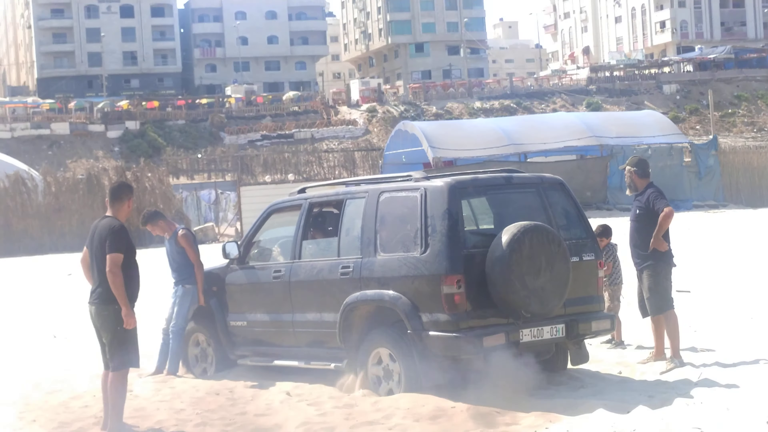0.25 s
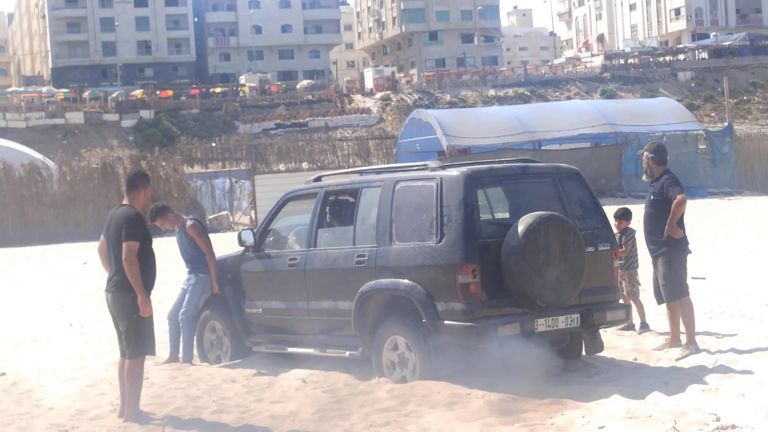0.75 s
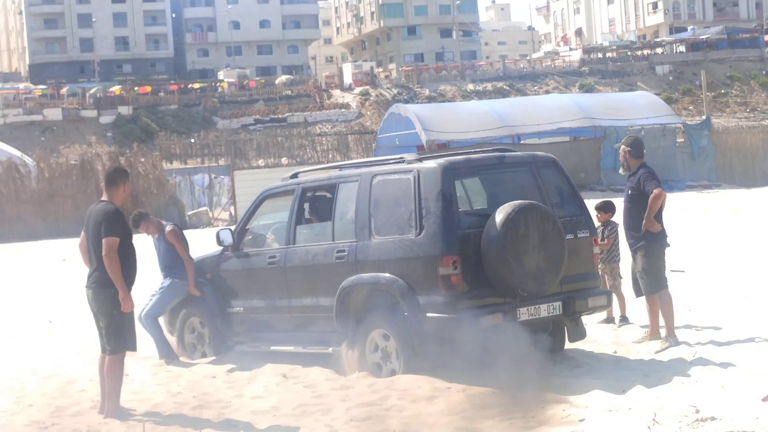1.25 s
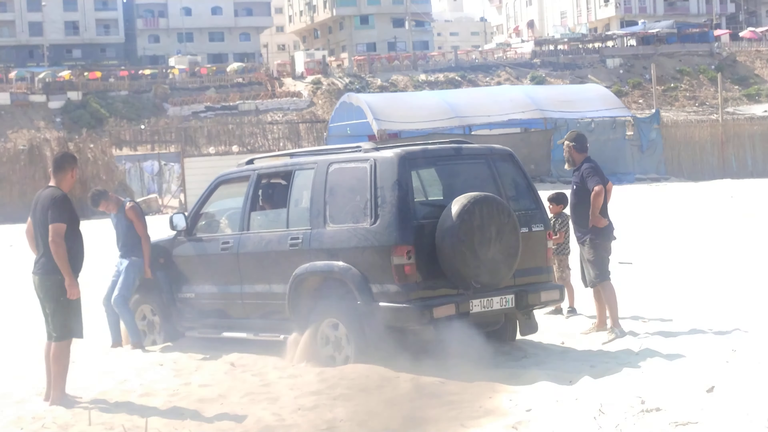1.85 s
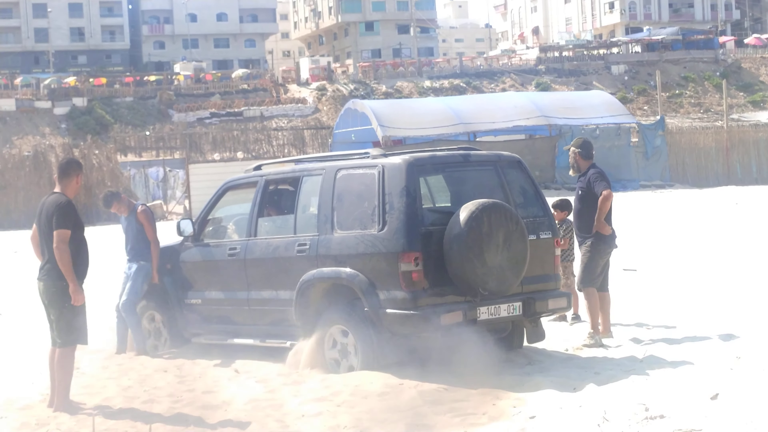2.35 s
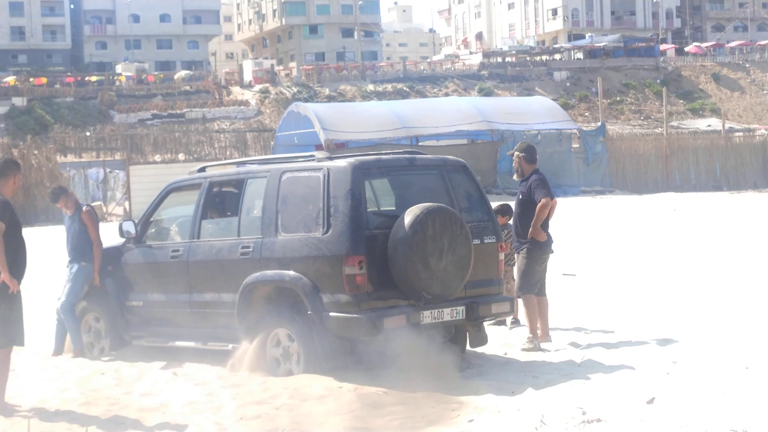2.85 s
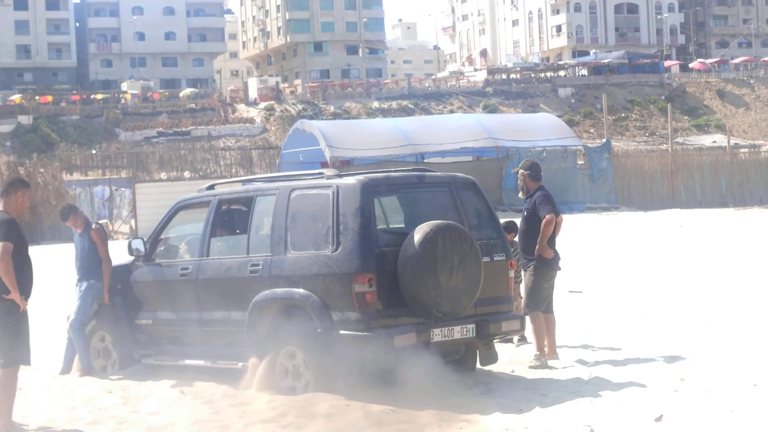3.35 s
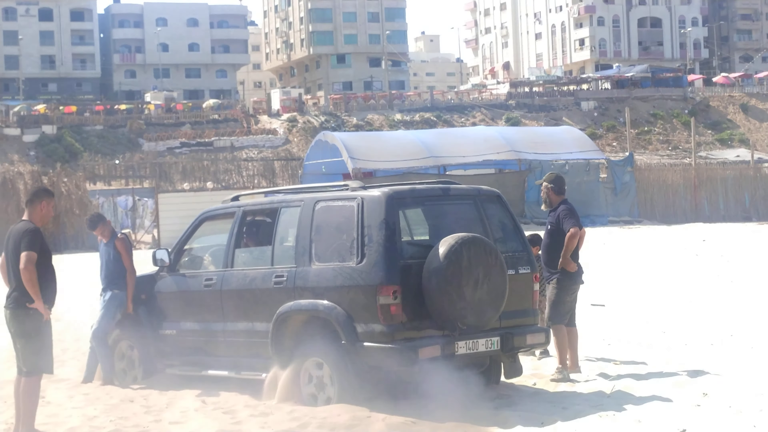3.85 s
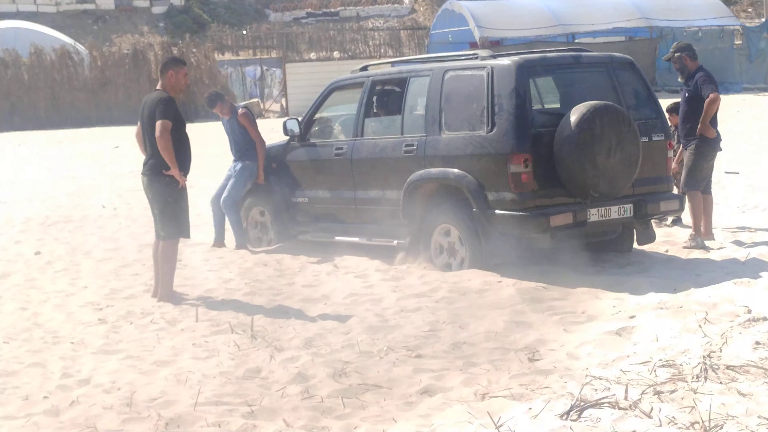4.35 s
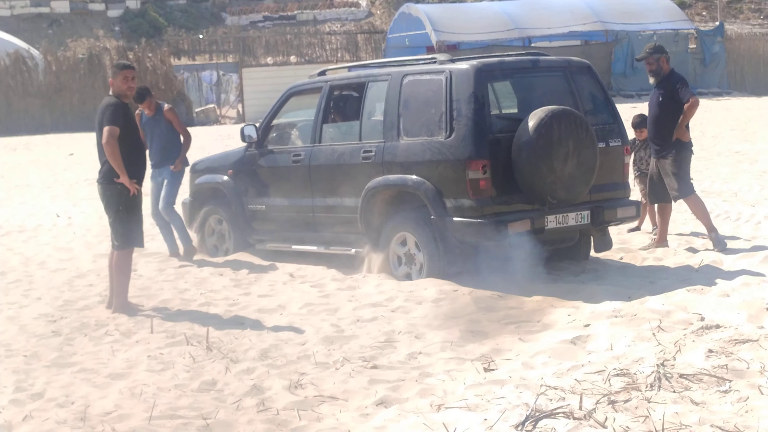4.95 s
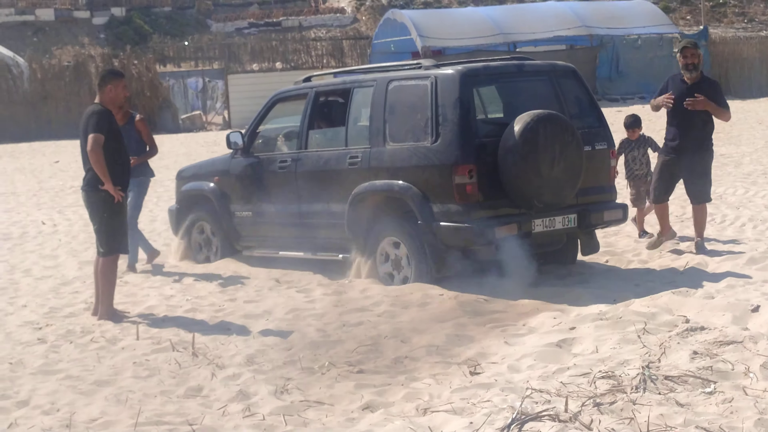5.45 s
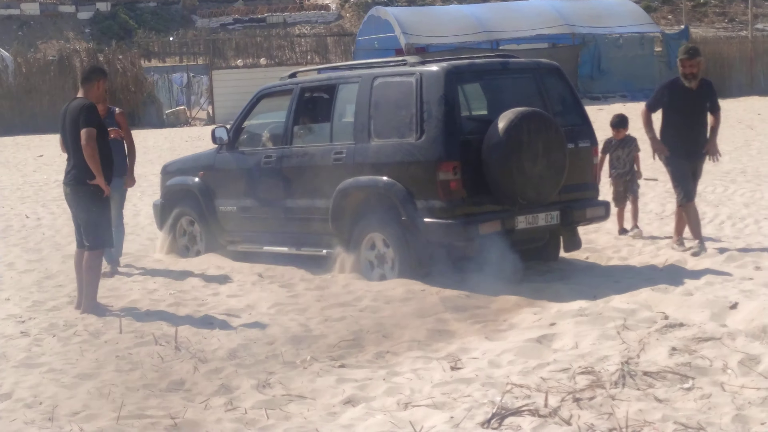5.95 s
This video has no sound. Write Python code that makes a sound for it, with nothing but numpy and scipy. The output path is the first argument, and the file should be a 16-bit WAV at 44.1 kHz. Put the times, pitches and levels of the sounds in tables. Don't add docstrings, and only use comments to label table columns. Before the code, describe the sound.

A stuck four-cylinder diesel takes up load with belt whirr, a hissing burst of sand and a dull driveline clunk, then drones hard with exhaust roar and valve clatter. Later it eases down with another clunk and a little grit shower, and runs on lower. Outdoors, handheld phone, low gusty wind thumps hitting chiefly the right side, very faint distant surf.

```python
import sys
import numpy as np
from scipy import signal
from scipy.fft import rfft, irfft, next_fast_len
from scipy.io import wavfile
from scipy.ndimage import uniform_filter1d

SR = 44100
rng = np.random.default_rng(int(sys.argv[2]) if len(sys.argv) > 2 else 0)


def transcribe(signal):
    frames = np.atleast_2d(signal).T
    limited = np.clip(frames, -1, 1)
    pcm = np.round(limited * 32767).astype(np.int16)
    wavfile.write(sys.argv[1], SR, pcm)


def invert_db(level):
    return 10 ** (np.asarray(level, dtype=float) / 20)


N = 272979
T = np.arange(N) / SR
FFT_SIZE = next_fast_len(N)
HZ = np.fft.rfftfreq(FFT_SIZE, 1 / SR)
TURN_S = 4.2

# time in seconds, firings per second.
FIRING_RATE = [(0, 65.3), (.15, 65.6), (.3, 69.9), (.45, 81), (.6, 93.5), (.73, 98.5), (.9, 93.9),
               (1.05, 92.5), (1.8, 92.6), (2.25, 93.9), (2.85, 94.5), (3.55, 94.3), (3.8, 91), (4.05, 80.7),
               (4.2, 74.1), (4.35, 70.9), (5.9, 69.6), (6.19, 72.5)]
# time in seconds, load 0-1, valve gear chatter 0-1.
EFFORT = [(0, 0, 0.45), (.3, 0, 0.6), (.45, 0.26, 0.93), (.75, 0.66, 0.9), (1.05, 0.75, 0.93),
          (1.8, 0.68, 0.9), (2.85, 0.72, 1), (3.55, 0.82, 0.87), (3.75, 0.8, 0.46), (4.05, 0.22, 0.26),
          (4.2, 0, 0.8), (4.35, 0.19, 0.88), (4.9, 0.02, 0.92), (5.05, 0.03, 0.46), (5.7, 0.07, 0.4),
          (6.19, 0.04, 0.7)]
# frequency in Hz, density in dB per Hz.
HISS = [(1880, -18.5), (3200, -1.5), (3560, -1.5), (3850, -0.5), (4190, -3.5), (4940, -5.5), (5420, -4.5),
        (5980, -8), (7100, -7.5), (7340, -8.5), (9300, -2.5), (10700, -13.5), (11500, -19), (13400, -25.5),
        (15400, -31)]


def evened(x):
    return x / np.sqrt(np.mean(x ** 2) + 1e-20)


def read(points, hz):
    f, value = np.transpose(points)
    return np.interp(np.log(hz + 1), np.log(f + 1), value)


def curve(rows, column=1):
    rows = np.array(rows)
    return np.interp(T, rows[:, 0], rows[:, column])


def wander(rate_hz):
    lowpass = signal.butter(2, rate_hz, fs=SR, output="sos")
    return evened(signal.sosfilt(lowpass, rng.standard_normal(N + SR))[SR:])


def coloured(x, spectrum):
    inside = (HZ > spectrum[0][0]) & (HZ < spectrum[-1][0])
    shaped = rfft(x, FFT_SIZE) * invert_db(read(spectrum, HZ)) * inside
    return evened(irfft(shaped, FFT_SIZE)[..., :N])


def add(mix, s, sound):
    part = mix[max(round(s * SR), 0):][:len(sound)]
    part += sound[:len(part)]


def surf():
    # frequency in Hz, density in dB per Hz.
    wash = [(380, 0.5), (430, -2.5), (480, 2), (620, -2.5), (800, -5.5), (950, -20)]
    return invert_db(-57) * coloured(rng.standard_normal((2, N)), wash)


def eddy(s, db, hz, length_s):
    u = np.linspace(0, 1, round(length_s * SR))
    rise = np.clip(.8 - max(db + 12, 0) * .04, .3, 1)
    shape = np.sin(np.pi * u ** rise) ** 2
    peak = shape.argmax()
    turns = np.cumsum(hz * (.8 + .45 * np.exp(-u / .3))) / SR
    swing = 2 * np.pi * (turns - turns[peak] + .3 * (rng.random() - .5))
    pressure = -np.cos(swing) - 0.19 * np.cos(2 * swing)
    return s - peak / SR, invert_db(db - 3.6) * pressure * shape


def eddy_streets():
    # start and end in seconds, level in dB.
    spells = [
        (4.492, 5, -25.5),
        (4.2, 3.7, -16),
        (5.442, 5, -18),
        (5.2, 5.26, -24),
        (2.055, 2.09, -8.5),
        (0.33, .41, -18),
    ]
    pace_s, length_ms = .034, 11
    rows = []
    for start, end, db in spells:
        for i in range(12):
            late, size, pitch = rng.random(3)
            s = start + pace_s * (i + 0.95 * late)
            if s < end:
                rows.append((s, db + 2.3 * (size - .5), 180 + 150 * pitch, length_ms))
    return rows


def wind():
    # time in seconds, level in dB, pitch in Hz, length in ms.
    left_eddies = [
        (.805, -20, 233, 24),
        (1.834, -9.5, 278, 11),
        (1.86, -22, 200, 12),
        (5.61, -13, 240, 6.9),
        (5.628, -15, 205, 22),
        (5.65, -25, 180, 11),
    ]
    right_eddies = [(0.05, -16, 300, 4.5), (0.064, -18, 226, 3.9), (1.129, -14, 317, 28),
                    (1.968, -16.5, 343, 24), (1.995, -7.5, 357, 7), (2.017, -5, 278, 5.4),
                    (2.028, -17, 249, 5.2), (2.039, -8, 215, 5.8), (2.051, -5.5, 183, 5.3),
                    (2.094, -9, 240, 13), (2.104, -8.5, 214, 4.8), (2.131, -10, 355, 19),
                    (2.541, -15, 289, 4.5), (2.591, -13, 215, 13), (2.633, -14.5, 368, 5),
                    (2.85, -19, 310, 7.6), (2.884, -21, 250, 8), (2.904, -19, 230, 6.5),
                    (2.916, -13.5, 220, 12), (3.219, -7, 270, 14), (3.234, -14, 190, 4.3),
                    (3.481, -9.5, 295, 5.4), (3.494, -14.5, 228, 10), (3.51, -17, 225, 4),
                    (3.559, -19.5, 380, 9.3), (3.599, -17, 193, 7.9), (3.621, -12, 226, 8.4),
                    (3.638, -9, 255, 11), (3.657, -8.5, 258, 6.2), (3.676, -10, 324, 4),
                    (3.712, -7, 362, 3.6), (3.722, -11, 276, 9.6), (3.731, -10, 177, 4),
                    (3.772, -16, 296, 9.9),
                    (3.826, -12, 269, 9.4), (3.846, -14, 237, 8.7), (3.861, -13, 202, 12),
                         (3.887, -34, 242, 6.2), (3.904, -11.5, 312, 3.5), (3.932, -13, 210, 7),
                         (4.0, -18, 354, 13), (4.017, -23, 230, 7), (4.04, -16.5, 245, 6.8),
                         (4.056, -8.5, 235, 5.4), (4.081, -10.5, 217, 9.8), (4.092, -31, 207, 13),
                         (4.564, -21.5, 160, 14), (4.669, -8.5, 280, 4.4), (4.687, -13, 312, 2.2),
                         (4.704, -14.5, 306, 23), (4.716, -12, 340, 3.2), (4.731, -20, 188, 11),
                         (4.745, -13, 220, 5.8), (4.775, -19, 261, 3.7), (4.816, -5, 223, 3.4),
                         (4.836, -19, 172, 8.3), (4.854, -5.5, 240, 7), (4.864, -7.5, 236, 3),
                         (4.877, -4.5, 317, 4.7), (4.906, -2.5, 357, 5.4), (4.921, -11, 256, 5.9),
                         (5.124, -12.5, 272, 5.1), (5.134, -12, 228, 13), (5.148, -17, 236, 4.9),
                         (5.161, -16, 194, 11), (5.692, -14.5, 356, 18), (5.709, -15, 277, 7.7)]
    tears = [(2.008, -6, 430, 5.6), (2.127, -12, 680, 4.5), (3.215, -16, 480, 2.2), (3.712, -20, 696, 2),
             (3.998, -20, 603, 3.6), (5.701, -21, 603, 4.2), (4.679, -12, 530, 4.2), (4.806, -9.5, 190, 10),
             (4.875, -16, 630, 3), (4.904, -18, 1300, 0.68), (4.903, -29, 2030, 0.85),
             (4.912, -10.5, 788, 2.5), (4.918, -18, 1090, 5.3)]
    # time in seconds, level in dB.
    push = [(0, -27), (.2, -31), (.38, -28), (.6, -50), (.81, -44), (.95, -33), (1.3, -36), (1.68, -24),
            (1.85, -28), (2.3, -29.5), (2.75, -21), (3.05, -26.5), (3.6, -24.5), (4.05, -18), (4.35, -29),
            (4.75, -20), (5.35, -29.5), (6.19, -30.5)]
    # peak time in seconds, level in dB, port (0 left, 1 right).
    heaves = [(.05, -34, 1), (.55, -41, 1), (.81, -39, 1), (1.125, -25, 1), (1.68, -38, 1), (2.13, -29, 1),
              (2.6, -36, 1), (2.85, -31, 1), (3.1, -38, 1), (3.22, -27, 1), (3.47, -38, 1), (3.64, -23, 1),
              (3.73, -37, 1), (4.57, -33, 1), (4.72, -25, 1), (4.9, -21, 1), (5.16, -26, 1), (5.71, -24, 1),
              (1.84, -31, 0), (1.97, -35, 0), (2.13, -30, 0), (4.8, -44, 0), (5.62, -38, 0), (5.7, -33, 0)]
    # frequency in Hz, density in dB per Hz.
    flutter_colour = [(40, -13), (90, -2.5), (200, 4), (350, -1.5), (600, -12.5), (1000, -22.5),
                      (1800, -43), (2600, -41)]
    rumble_colour = [(4, 7), (15, 1), (45, 4.5), (100, -0.5), (150, 2.5), (300, -13)]
    calm_db, lee_db, heave_s = (-47, -43.5), -14.5, 0.034
    rip_hz, rip_db, rip_power = 430, -33, .15

    out, t = np.zeros((2, N)), np.arange(8000) / SR
    heave = t / heave_s * np.exp(1 - t / heave_s)
    lowpass = signal.butter(2, rip_hz, fs=SR, output="sos")
    right_rows = [*right_eddies, *tears, *eddy_streets()]
    for port, rows in enumerate((left_eddies, right_rows)):
        breeze = invert_db(curve(push) + lee_db * (1.5 - port) + 0.68 * wander(8.8))
        flutter = breeze * invert_db(-2.5 + 1.2 * wander(0.57))
        rumble = breeze + invert_db(calm_db[port] + 0.75 * wander(0.78))
        for s, db, hz, ms in rows:
            add(out[port], *eddy(s, db, hz, 0.0071 + 0.0012 * ms))
            stir = np.minimum(t / 0.009, 1) ** 2 * np.exp(-(t / (0.00044 * ms + 0.017)) ** 2)
            add(flutter, s - .012, invert_db(-30 + 1.3 * (db + 16)) * stir)
        for s, db, heaved_port in heaves:
            if round(heaved_port) == port:
                add(rumble, s - heave_s, invert_db(db) * heave)
        lumps = coloured(invert_db(2.0 * wander(56.0)) * rng.standard_normal(N), flutter_colour)
        dull = signal.sosfiltfilt(lowpass, lumps)
        rip = (lumps - dull) * (flutter / invert_db(rip_db)) ** rip_power
        out[port] += flutter * (dull + rip)
        out[port] += rumble * coloured(rng.standard_normal(N), rumble_colour)
    return out


def grit_ticks():
    # time in seconds, peak level in dB, pitch in Hz.
    hits = [
        (0.3336, -28, 9100),
        (0.6843, -30, 9200),
        (1.1937, -16.5, 6800),
        (1.8218, -29, 9630),
        (1.8502, -25, 8200),
        (2.2333, -30.5, 9900),
        (2.3281, -30.5, 9110),
        (2.3765, -28, 9200),
        (3.2924, -68, 9470),
        (4.2494, -34, 9200),
    ]
    out, t = np.zeros(N), np.arange(3000) / SR
    for s, db, hz in hits:
        band = signal.butter(4, [.68 * hz, 11300], "bandpass", fs=SR, output="sos")
        ping = np.cos(2 * np.pi * hz * t) * np.exp(-t / 0.0002)
        fizz = 0.046 * rng.standard_normal(len(t)) * np.exp(-t / 0.00056)
        add(out, s + 0.00071, invert_db(db + 5.5) * signal.sosfilt(band, ping + fizz))
    return out


def driveline_clunks():
    # time in seconds, peak level in dB, pitch in Hz.
    hits = [
        (0.788, -27, 1060),
        (1.437, -26.5, 1060),
        (3.551, -29, 744),
        (4.237, -23.5, 930),
    ]
    out, t = np.zeros(N), np.arange(3000) / SR
    envelope = np.exp(-t / 0.01) * np.minimum(t / 0.001, 1)
    for s, db, hz in hits:
        modes = (.39, .88, 1, 1.13, 1.27, 2.4)
        ring = sum(np.sin(2 * np.pi * hz * k * t + 6 * rng.random()) for k in modes)
        add(out, s, invert_db(db - 11.5) * ring * envelope)
    return out


def sand():
    # time in seconds, level in dB.
    spray_db = [(0, -51), (.25, -50), (.34, -46), (.5, -45.5), (.72, -42), (.85, -52), (1.0, -51),
                (1.15, -101), (6.19, -72)]
    grit_db = [(0, -56.5), (4.22, -81.5), (4.243, -48), (4.265, -44.5), (4.285, -54), (4.31, -47),
               (4.325, -45), (4.35, -74), (6.19, -67)]
    # frequency in Hz, density in dB per Hz.
    spray_colour = [(880, -30), (1500, -15.5), (2170, -4), (2480, -4), (3160, -34), (3550, -10),
                    (4310, -10), (9550, -9), (13800, -20), (15200, -56)]
    grains = invert_db(1.3 * rng.exponential(1, (2, N))) * rng.standard_normal((2, N))
    spray = invert_db(curve(spray_db) + 0.85 * wander(1.9)) * coloured(grains, spray_colour)
    return spray + invert_db(curve(grit_db)) * coloured(grains, HISS)


def puffing(turns, spectrum, depth, patchy_db):
    strength = invert_db(patchy_db * rng.standard_normal(700))[turns.astype(int)]
    gate = 1 + depth * strength * np.exp(-(turns % 1) / 0.36)
    return coloured(gate * rng.standard_normal((2, N)), spectrum)


def gear_whine(turns):
    # start and end in seconds, multiple of the firing rate, level in dB.
    meshes = [
        (2.7, 3.5, 25, -49),
        (4.5, 4.98, 24.9, -53),
        (5.2, 5.9, 24.93, -61),
        (5.0, 6.0, 17.9, -57),
    ]
    fade_s = 0.19
    slip = .1 * wander(6.0)
    tone = np.zeros(N)
    for start, end, k, db in meshes:
        fade = np.clip(np.minimum(T - start, end - T) / fade_s + 1, 0, 1) ** 2
        tone += invert_db(db) * fade * np.cos(2 * np.pi * (k * turns + slip))
    return tone * invert_db(1.2 * wander(9.7))


def belt_whirr(turns):
    # time in seconds, level in dB.
    whirr_db = [(0, -46), (.2, -43.5), (.3, -46), (.42, -56), (.55, -93), (6.19, -79)]
    # frequency in Hz, density in dB per Hz.
    whirr_colour = [(480, -13), (600, -9), (720, -20), (950, -34), (1400, -20), (1650, -11), (1900, -10),
                    (2200, -9), (2400, -42)]
    return invert_db(curve(whirr_db)) * puffing(turns, whirr_colour, depth=.7, patchy_db=1.0)


def drone(turns):
    # multiple of the firing rate, level in dB eased off, level in dB under load.
    orders = [(1, -39.5, -42.5), (1.5, -53, -44), (1.75, -60, -47), (2, -44.5, -32.5), (2.25, -60, -48),
              (2.5, -54, -51), (3, -47, -35.5), (3.75, -60, -48), (4, -56, -39), (4.25, -58, -50),
              (4.5, -56, -50), (4.75, -54, -56), (5, -60, -58), (4.62, -51, -62), (5.18, -45.5, -60),
              (5.5, -52, -67), (6, -60, -68)]
    pipe_hz, pipe_width_hz, pipe_db = 408, 16, 8
    load, speed = np.clip(curve(EFFORT), 0, 1), curve(FIRING_RATE)
    speed_change = np.gradient(speed) * SR
    unrest = uniform_filter1d(abs(speed_change), size=9000)
    pull = uniform_filter1d(np.maximum(speed_change, 0), size=6000)
    flare = uniform_filter1d(np.maximum(speed - 93.5, 0), size=8000, origin=2500)
    closing = np.maximum(-uniform_filter1d(np.gradient(load) * SR, size=6000), 0)
    out = np.zeros(N)
    for k, eased_db, load_db in orders:
        slip = rng.random() + .004 * k * wander(3.0)
        db = eased_db + load * (load_db - eased_db) + 1.2 * wander(4.0)
        db += pipe_db * np.exp(-((k * speed - pipe_hz) / pipe_width_hz) ** 2)
        if k == 1.5:
            db += 2.0 * flare
        if k == 2:
            db -= .22 * unrest
        if k == 3:
            db += .05 * pull
        out += invert_db(db) * np.cos(2 * np.pi * (k * turns + slip))
    return np.sqrt(2) * out * invert_db(-3.5 * closing)


def level(rest_db, rise_db, column):
    return invert_db(rest_db + rise_db * curve(EFFORT, column))


def engine():
    # frequency in Hz, density in dB per Hz.
    exhaust_colour = [(24, -46), (40, -28), (81, -21), (130, -15), (187, -7.5), (231, -10), (316, -11),
                      (407, -6.5), (470, -15), (671, -35), (800, -57), (1040, -97), (1760, -120)]
    knock_colour = [(420, -44), (720, -12), (779, -9.5), (814, 0), (982, 3), (1450, -5), (1540, -4.5),
                    (1740, -4), (2050, -10.5), (2660, -5), (4510, -120)]
    clatter_colour = [(1150, -28), (1950, -11.5), (2060, -12), (2320, -1), (2480, 1), (2580, -0.5),
                      (2940, -9.5), (3400, -29.5), (4420, -21.5), (7480, -120)]
    turns = np.cumsum(curve(FIRING_RATE)) / SR

    roar = puffing(turns, exhaust_colour, depth=0.27, patchy_db=2.0)
    roar *= level(-39.5, 9.5, column=1) * invert_db(.8 * wander(7.1))
    knock = puffing(turns, knock_colour, depth=0.26, patchy_db=6.0)
    knock *= level(-45.5, 4.5, column=1) * invert_db(0.32 * wander(9.0))
    clatter = puffing(turns, clatter_colour, depth=0.42, patchy_db=2.5)
    clatter *= level(-58, 14.5, column=2) * invert_db(0.62 * wander(4.0))
    hiss = puffing(turns, HISS, depth=0.6, patchy_db=-2.5)
    hiss *= level(-48.5, 3.5, column=1) * invert_db(0.52 * wander(9.2) + 1.06 * curve(EFFORT, column=2))

    direct_drone = drone(turns) * [[1.12], [0]]
    return direct_drone + gear_whine(turns) + belt_whirr(turns) + roar + knock + clatter + hiss


def ports(direct, scattered):
    # frequency in Hz, likeness of the two ports 0-1.
    likeness = [(60, 1), (300, .95), (640, 1), (1400, .88), (2500, .85), (3300, .7), (5000, .6),
                (9000, .45), (15000, .3)]
    # frequency in Hz, lag of the left port in samples.
    left_lag = [(300, 0.66), (1000, 5.3), (2500, 3.9), (5000, 5), (9000, 3.8)]
    # frequency in Hz, left over right in dB.
    left_over_right = [(60, -1.5), (110, 0.5), (200, -1.5), (380, 2), (700, -2), (1290, 0), (2380, 5),
                       (4400, 1), (8120, 1.5), (15000, -4)]
    same = np.clip(read(likeness, HZ), 0, 1)
    a, b = rfft(direct, FFT_SIZE), rfft(scattered, FFT_SIZE)
    delay = np.exp(-2j * np.pi * HZ * read(left_lag, HZ) / SR)
    left = same * a * delay + np.sqrt(1 - same ** 2) * b
    right = a * invert_db(-read(left_over_right, HZ))
    return irfft(np.array([left, right]), FFT_SIZE)[:, :N]


def turned(x):
    # frequency in Hz, gain of the right port in dB.
    facing = [(1000, 0), (1500, 3.5), (1900, 5), (2650, -4), (3700, -3), (5000, 0)]
    swing_s = .12
    left, right = x
    later = irfft(rfft(right, FFT_SIZE) * invert_db(read(facing, HZ)), FFT_SIZE)[:N]
    share = np.clip((T - TURN_S) / swing_s + .5, 0, 1)
    return np.array([left, right + share * (later - right)])


def scene():
    around = surf() + grit_ticks() + driveline_clunks() + sand() + engine()
    return turned(ports(*around)) + wind()


def thinned(x):
    # frequency in Hz, share of bands left empty 0-1.
    empty_share = [(3000, 0), (3500, .4), (3800, .05), (4350, .5), (4600, .2), (4900, .3), (5400, .05),
                   (5900, .85), (6300, .2), (6700, .15), (7150, .55), (7600, .12), (8500, .03),
                   (10000, .05), (11000, .4), (12200, .93), (13200, .3), (15300, .97)]
    starved_spells = [
        (.8, 1.19),
        (4.62, 4.95),
    ]
    hz, t, z = signal.stft(x, SR, nperseg=2048, noverlap=1024)
    bins = hz[:, None]
    luck = evened(uniform_filter1d(rng.standard_normal((len(t), 205)), size=3, axis=0))
    rank = (.5 + .5 * np.tanh(.85 * luck)).T.repeat(5, axis=0)

    power = abs(z) ** 2
    near = uniform_filter1d(uniform_filter1d(power, size=17, axis=1), size=3, axis=2)
    usual = np.median(near, axis=2, keepdims=True)
    faint = np.clip(usual / (near + 1e-20), 0, 1.3).mean(0) ** .5

    seen_hz = bins * np.where((t > TURN_S) & (bins < 8000), 1.05, 1)
    starved = np.zeros(rank.shape[:1] + t.shape, bool)
    for start, end in starved_spells:
        edge_hz = np.maximum(11000, 14500 - 16000 * (t - start))
        starved |= (t > start) & (t < end) & (bins > edge_hz)
    empty = rank < np.where(starved, .8, read(empty_share, seen_hz) * faint)

    floor = np.interp(hz, [500, 900, 3000, 4000, 11000], [0, .3, .4, .8, 1.1])[:, None]
    weak = power < floor * near * (faint > .6)
    return signal.istft(z * ~empty * ~weak, SR, nperseg=2048, noverlap=1024)[1][:, :N]


def roll_off(x):
    return signal.sosfilt(signal.butter(12, 15590, fs=SR, output="sos"), x)


def record(dry):
    mix = thinned(np.clip(dry, -.98, .98))
    return roll_off(mix)


dry = scene()
out = record(dry)
transcribe(out)
```